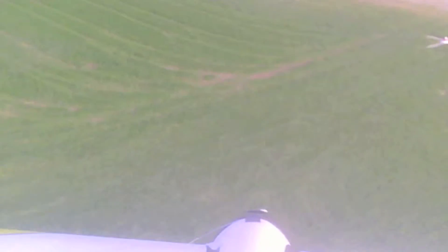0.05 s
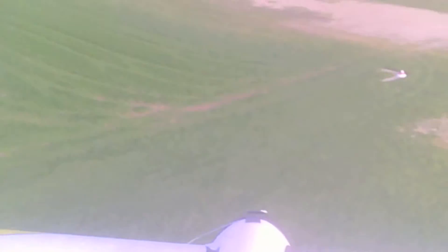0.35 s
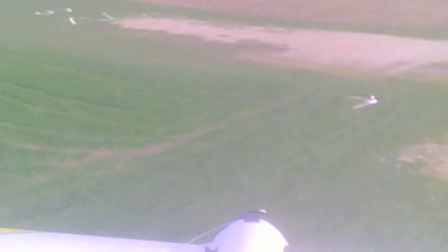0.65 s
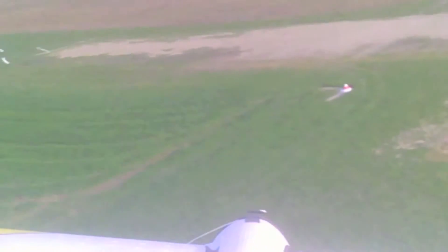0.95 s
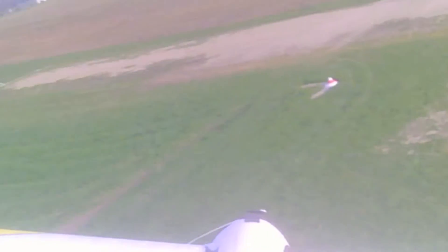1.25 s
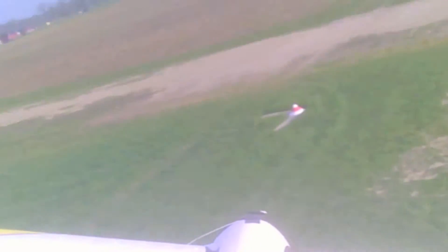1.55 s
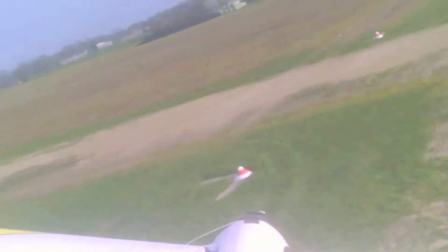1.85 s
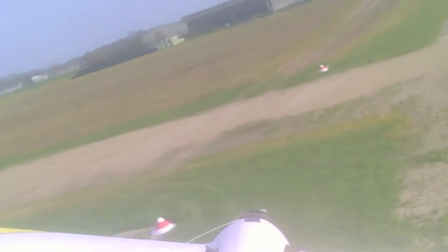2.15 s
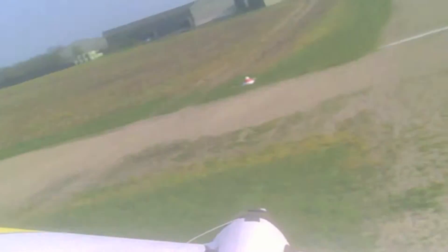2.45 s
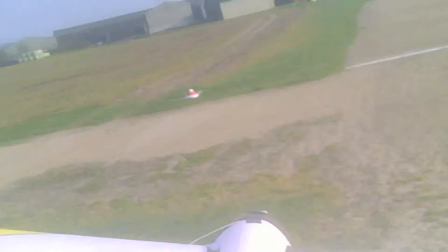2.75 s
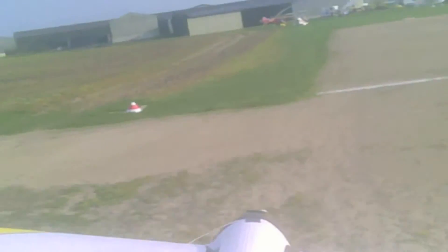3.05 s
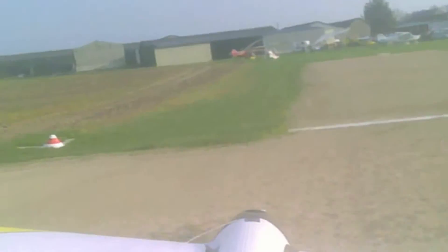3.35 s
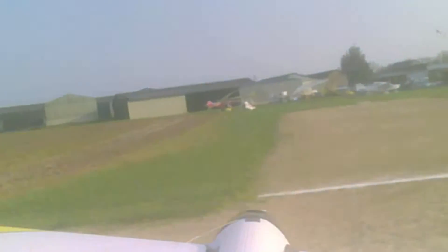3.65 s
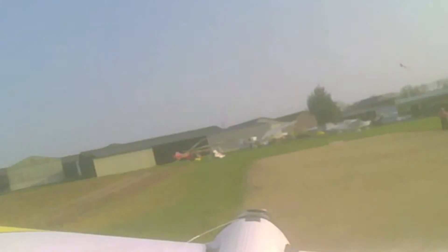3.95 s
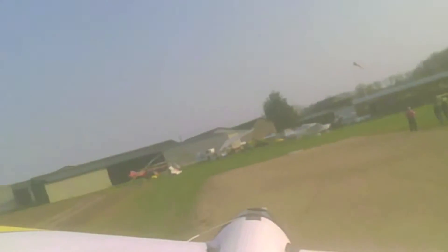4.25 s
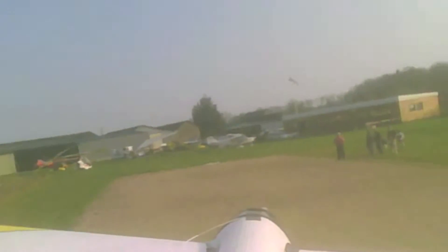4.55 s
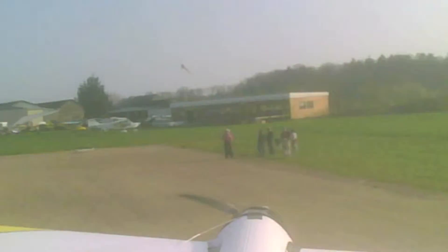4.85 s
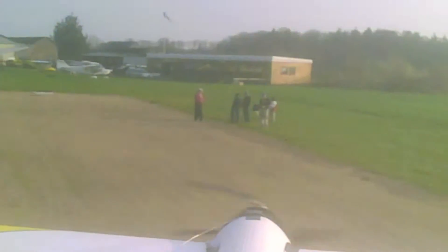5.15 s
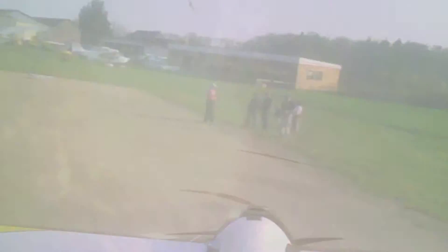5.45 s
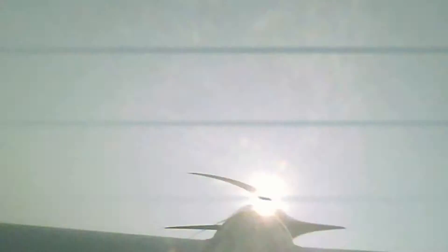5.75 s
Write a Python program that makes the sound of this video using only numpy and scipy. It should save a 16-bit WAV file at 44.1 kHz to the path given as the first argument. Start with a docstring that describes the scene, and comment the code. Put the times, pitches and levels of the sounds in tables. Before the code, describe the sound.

Wind rushes directly over a small microphone on a model aircraft flying outdoors: a low roar, a breathy rush and a thin hiss, fluttering with turbulence. It is loudest for the first second, with low thumps around 0.3, 0.7 and 1.2 seconds, then steps down suddenly. From about 2 seconds it fades gradually as the aircraft slows, while gusts keep bumping the microphone, notably at 2.5 and 2.9 seconds and again around 4.8 to 5.4. Faint, even electronic ticking, about thirty ticks a second, runs underneath throughout. At about 5 seconds a faint, thin, high whistle falls slightly in pitch and is gone almost at once. From around 5.5 seconds the wind blends into a hollower rush of air with louder ticks and a fine crackle, lasting until the end just before 6 seconds.

```python
"""Wind thumps, roars and hisses over the small camera of a model aircraft that dives, levels out and slows.
Turbulent eddies buffet the microphone port and the housing, and the noise fades as the aircraft slows.
The camera's electronics tick once per picture, and a faint whistle sounds late in the flight.
At the end the flight dissolves into a second, hollower rush of air with louder ticks and a fine crackle."""
import sys
import numpy as np
from scipy import signal
from scipy.fft import rfft, irfft
from scipy.io import wavfile
from scipy.ndimage import uniform_filter1d

SR = 44100
rng = np.random.default_rng(int(sys.argv[2]) if len(sys.argv) > 2 else 0)


def put_to_file(sound):
    """Save the sound as 16-bit audio at rate SR, in the file named by the first command-line argument."""
    columns = np.atleast_2d(sound).T  # one column per channel
    safe = np.clip(columns, -1, 1)
    whole_steps = np.round(safe * 32767)
    wavfile.write(sys.argv[1], SR, whole_steps.astype(np.int16))


N = 260190
TIME = np.arange(N) / SR
BIN_HZ = np.maximum(np.fft.rfftfreq(N, 1 / SR), 1)


def buffeting(wind_db, buffet_lift_db, roar_lift_db, slowed):
    """Turbulent pressure: large eddies thump on the port, smaller ones roar around the housing."""
    # Spectra of the buffet and of the roar at high and low airspeed.
    # Each row: frequency in Hz, relative density in dB.
    buffet_spectrum = [(4, -15.5), (10, 1), (25, -0.5), (45, -2), (70, -8.5), (90, -17.5), (130, -37)]
    roar_fast = [(44, -27), (75, 0), (194, -1.5), (231, -4.5), (268, -1.5), (333, -2.5), (417, -10),
                 (450, -17.5), (580, -44), (990, -120)]
    roar_slow = [(44, -26), (75, -1.5), (97, -1.5), (118, -1.5), (183, -2.5), (253, -3.5), (316, -7),
                 (357, -8), (450, -13), (580, -39), (990, -120)]
    # The roar builds early in the dive. Each row: time in seconds, level in dB against full strength.
    roar_build = [(.27, -5), (.6, 0)]
    cruise_db = -28   # loudness of the wind in level flight
    above_cruise_db = wind_db - cruise_db
    buffet_db = -25.5 + 0.38 * above_cruise_db + buffet_lift_db
    roar_db = -23 + 1.055 * above_cruise_db + in_time(roar_build) + roar_lift_db
    buffet = evened(coloured_noise(buffet_spectrum), span_s=0.12)
    roar = evened(blend(coloured_noise(roar_fast), coloured_noise(roar_slow), slowed), span_s=0.17)
    return from_db(buffet_db) * buffet + from_db(roar_db) * roar


def gusts_and_lulls():
    """Amplitude modulation: gusts and calm pockets shift the buffet and the roar, one dB curve for each."""
    # Each row: time of the peak in seconds, length in seconds, buffet lift in dB, roar lift in dB.
    gusts = [(0.344, .1, 5.5, 0), (0.687, 0.12, 5, -1), (1.04, 0.14, 1.5, 1), (1.168, 0.06, 10.5, -0.5),
             (2.25, 0.076, 3, 1), (2.367, 0.06, 4, 1.5), (2.513, 0.14, 7, -1.5), (2.75, 0.1, 3.5, 1),
             (2.9, 0.071, 13, 1), (3.267, 0.067, 5.5, 0.5), (3.574, 0.05, 2, 3), (3.757, 0.071, 1, 3),
             (4.17, .07, 4, -0.5), (4.77, 0.14, 5.5, 1), (4.938, 0.03, 2, 7), (5.055, 0.054, 5, -1.5),
             (5.15, 0.063, 5.5, 0), (5.363, 0.12, 5, 0)]
    # Each row: time of the trough in seconds, length in seconds, buffet drop in dB, roar drop in dB.
    lulls = [(.51, .05, 2.5, 5), (2.15, .05, 3.5, 1), (3.07, .09, 3, -0.5), (3.44, 0.098, 2, 2.5),
             (3.85, .1, 4, -1), (4.42, 0.053, 1, 1)]
    return bell_curves(gusts) - bell_curves(lulls)


def airflow(rush_db, slowed):
    """Resonance: the port colours a rush and a hiss, which waver together as fine eddies pass."""
    # Spectra of the rush at high and low airspeed and of the hiss.
    # Each row: frequency in Hz, relative density in dB.
    rush_fast = [(260, -30), (450, -1), (942, -5), (1440, -6), (2150, -12.5), (2500, -19), (3250, -43),
                 (5500, -120)]
    rush_slow = [(260, -26), (450, -5), (490, -1), (535, -0.5), (738, -5), (788, -5.5), (890, -5.5),
                 (1100, -6.5), (1600, -8), (2500, -17.5), (3250, -46), (5500, -120)]
    hiss_spectrum = [(1800, -31), (2500, -1.5), (3130, -3.5), (4400, -3.5), (5100, -4.5), (5750, -4.5),
                     (6260, -10), (6900, -10), (8000, -13.5), (8800, -15.5), (9350, -16), (9800, -23.5),
                     (11000, -2.5)]
    # Resonances of the microphone port. Each row: centre in Hz, width in Hz, lift in dB.
    port_peaks = [(1880, 580, 2), (3850, 600, 3)]
    # Envelope of the hiss. Each row: time in seconds, relative level in dB.
    hiss_level = [(0.0, -35.5), (0.24, -35), (1.18, -35.5), (1.23, -38), (2.74, -39), (3.56, -43),
                  (4.46, -45), (5.28, -44), (5.64, -49), (5.66, -47), (5.87, -43)]
    eddies = rms_one(from_db(0.5 * flutter(rate_hz=45)))
    fast, slow = coloured_noise(rush_fast, port_peaks), coloured_noise(rush_slow, port_peaks)
    rush = from_db(rush_db - 0.18) * blend(fast, slow, slowed)
    hiss = from_db(in_time(hiss_level) + 0.05) * coloured_noise(hiss_spectrum, port_peaks)
    return (rush + hiss) * eddies


def hollow_rush(rush_db):
    """Narrow resonances on broadband noise make the closing rush of air sound hollow."""
    # Its broad spectrum. Each row: frequency in Hz, relative density in dB.
    spectrum = [(350, -32.5), (470, 5), (650, -1), (900, 2), (1200, -3), (2000, -5.5), (3000, -15.5),
                (5000, -18), (6200, -25.5), (7600, -20.5), (9400, -28), (10000, -31), (10800, -38)]
    # Its resonances. Each row: centre in Hz, width in Hz, lift in dB.
    resonances = [(880, 90, 1.5), (1760, 110, 4), (2550, 80, 0), (3850, 250, 6)]
    return from_db(rush_db - 1.0) * coloured_noise(spectrum, resonances)


def picture_ticks(start_s, decay_s, uneven_db, overshoot):
    """Crosstalk: each supply current step leaks into the microphone as a spike that overshoots and sags."""
    # Current steps within one picture. Each row: delay in seconds, signed relative size.
    switching = [(0, 1), (.00092, -1), (.00105, .9), (.00142, -.65)]
    picture_hz = 30.012
    starts = np.arange(start_s, N / SR - 1 / picture_hz / 10, 1 / picture_hz)
    strength = from_db(uneven_db * rng.standard_normal(len(starts)))
    steps = np.zeros(N)
    for delay_s, size in switching:
        sample, fraction = np.divmod((starts + delay_s) * SR, 1)   # shared by two neighbouring samples
        steps[sample.astype(int)] += size * strength * (1 - fraction)
        steps[sample.astype(int) + 1] += size * strength * fraction
    pole = np.exp(-1 / (decay_s * SR))
    return signal.lfilter([1 + overshoot, -overshoot], [1, -pole], steps + 1e-18)


def crackle(per_s, spread_db):
    """A Poisson process: tiny clicks fall at random moments, brightened by a first difference."""
    clicks = (rng.random(N) < per_s / SR) * from_db(spread_db * rng.standard_normal(N))
    return np.diff(clicks, prepend=0)


def whistle(waver_hz):
    """Random frequency modulation unsteadies a thin, falling tone that sounds briefly in the wind."""
    # The tone's glide. Each row: time in seconds, pitch in Hz, peak level in dB.
    glide = [(4.94, 6100, -75), (4.99, 5930, -56), (5.045, 5770, -48), (5.08, 5750, -77)]
    pitch_hz, level_db = in_time(glide)
    phase = 2 * np.pi * np.cumsum(pitch_hz + waver_hz * flutter(rate_hz=110)) / SR
    sounding = (TIME > glide[0][0]) & (TIME < glide[-1][0])
    return sounding * from_db(level_db) * np.sin(phase)


def coloured_noise(spectrum, peaks=()):
    """Source and filter: white noise takes on a broad spectrum and resonance peaks, at unit rms."""
    hz, db = np.transpose(spectrum)
    colour_db = np.interp(np.log(BIN_HZ), np.log(hz), db, left=-np.inf, right=-np.inf)
    for centre_hz, width_hz, lift_db in peaks:
        colour_db = colour_db + lift_db / (1 + (2 * (BIN_HZ - centre_hz) / width_hz) ** 2)
    return rms_one(irfft(rfft(rng.standard_normal(N)) * from_db(colour_db), N))


def flutter(rate_hz):
    """Low-pass noise of unit rms wavers at up to about the given rate."""
    return rms_one(irfft(rfft(rng.standard_normal(N)) / (1 + (BIN_HZ / rate_hz) ** 2), N))


def evened(noise, span_s):
    """Division by the running rms takes the slow random swells out of a noise."""
    power = uniform_filter1d(noise ** 2, int(span_s * SR))
    smooth_power = uniform_filter1d(power, int(span_s * SR / 2))
    return noise / np.sqrt(smooth_power + 1e-9)


def bell_curves(rows):
    """Gaussian swells add up in dB for buffet and roar; each length is the full width at half height."""
    centre_s, length_s, buffet_db, roar_db = np.transpose(rows)
    shapes = 0.5 ** ((2 * (TIME - centre_s[:, None]) / length_s[:, None]) ** 2)
    return np.array([buffet_db, roar_db]) @ shapes


def blend(first, second, share):
    """Uncorrelated noises add in power, so the squared weights of this crossfade sum to one."""
    return ((1 - share) * first + share * second) / np.hypot(1 - share, share)


def in_time(rows):
    """Linear interpolation turns rows of a time in seconds and values into one curve per value."""
    times_s, *columns = np.transpose(rows)
    return np.squeeze([np.interp(TIME, times_s, column) for column in columns])


def from_db(db):
    """Amplitude grows tenfold for every 20 dB."""
    return 10 ** (np.asarray(db) / 20)


def rms_one(x):
    """Normalisation brings a signal to unit rms."""
    return x / np.sqrt(np.mean(x ** 2) + 1e-20)


def scene():
    """Superposition: wind and ticks add, and the flight crossfades into the hollow rush."""
    # Loudness of the wind; the whole sound steps down suddenly at about 1.2 s.
    # Each row: time in seconds, relative level in dB.
    wind_level = [(0.0, -22.5), (0.65, -22), (0.72, -24), (1.18, -23.5), (1.21, -26), (1.93, -25.5),
                  (3.51, -32), (3.55, -31), (4.04, -32), (4.23, -30.5), (4.58, -33), (5.26, -33),
                  (5.54, -37), (5.87, -33)]
    # Loss of airspeed. Each row: time in seconds, share of the low-speed spectra from 0 to 1.
    slowing = [(1.8, 0.01), (3.4, 0.98)]
    # The crossfade. Each row: time in seconds, share of the closing sound from 0 to 1.
    dissolve = [(5.35, 0.1), (5.5, 0.14), (5.62, 0.41), (5.8, 0.82), (5.9, 0.85)]
    # Loudness of the ticks in flight. Each row: time in seconds, gain in dB.
    tick_level = [(0, -19.5), (1.15, -18), (1.22, -22), (2.2, -22), (3.2, -24), (4.2, -23), (5.2, -22)]
    wind_db, slowed, closing = in_time(wind_level), in_time(slowing), in_time(dissolve)
    buffet_lift_db, roar_lift_db = gusts_and_lulls()
    rush_db = wind_db + 0.068 * (buffet_lift_db + roar_lift_db)   # gusts barely reach the rush
    rush = blend(airflow(rush_db, slowed), hollow_rush(rush_db), closing)
    flight_ticks = picture_ticks(start_s=0.02541, decay_s=0.00038, uneven_db=0, overshoot=0.33)
    flight_ticks *= from_db(in_time(tick_level))
    closing_ticks = picture_ticks(start_s=0.02935, decay_s=0.0009, uneven_db=2, overshoot=0.35)
    closing_ticks *= from_db(-16)
    closing_crackle = from_db(-24) * crackle(per_s=180, spread_db=1)
    wind = buffeting(wind_db, buffet_lift_db, roar_lift_db, slowed) + rush + whistle(waver_hz=80.8)
    return (wind + (1 - closing) * flight_ticks + closing * (closing_ticks + closing_crackle))[None]


def record(dry):
    """Band limiting: the camera's low-pass filter rolls the treble off steeply."""
    cutoff_hz = 9900
    low_pass = signal.firwin(81, cutoff_hz, window=("kaiser", 7), fs=SR)
    return signal.fftconvolve(dry, low_pass[None], mode="same")


dry = scene()
out = record(dry)
put_to_file(out)
```